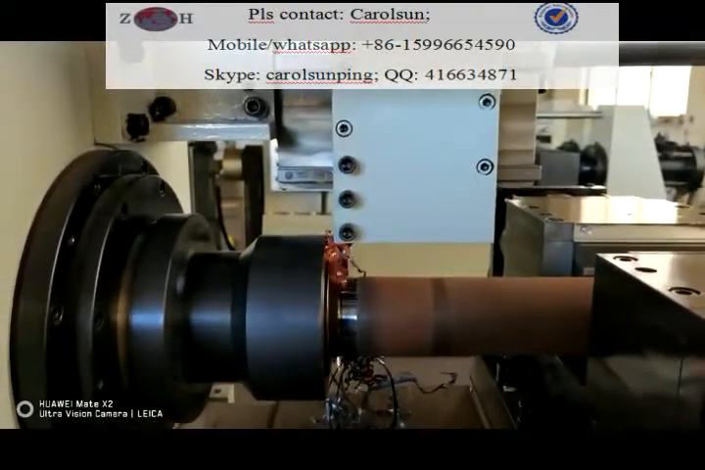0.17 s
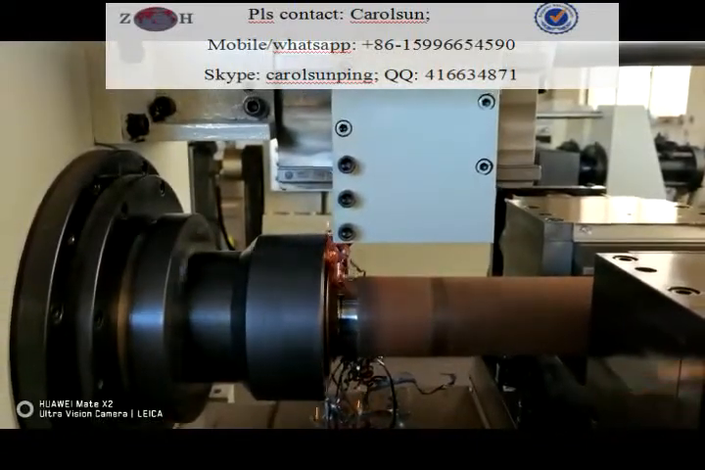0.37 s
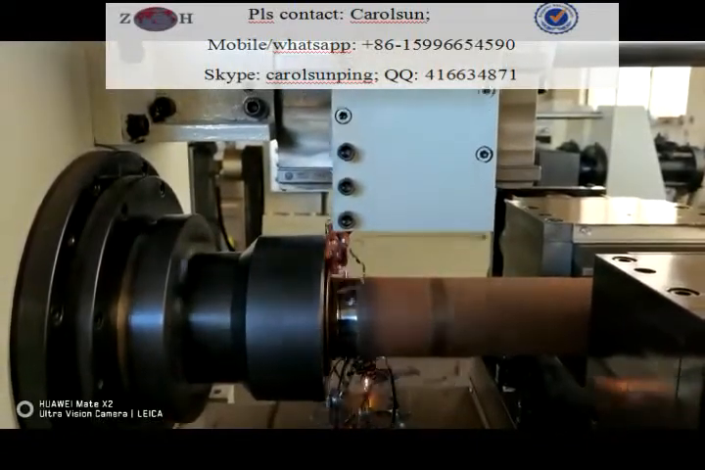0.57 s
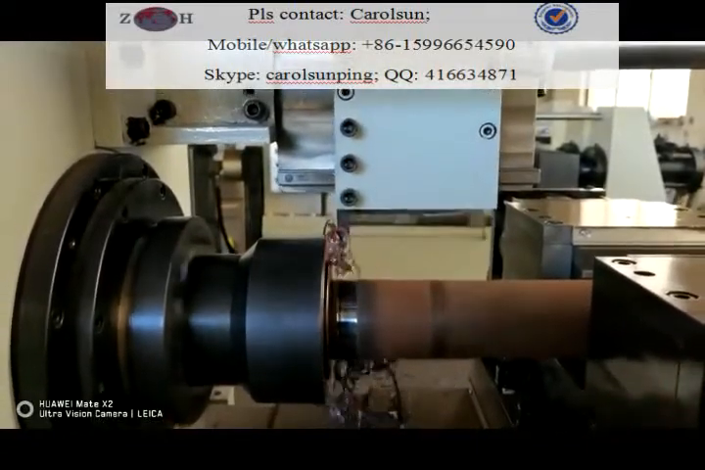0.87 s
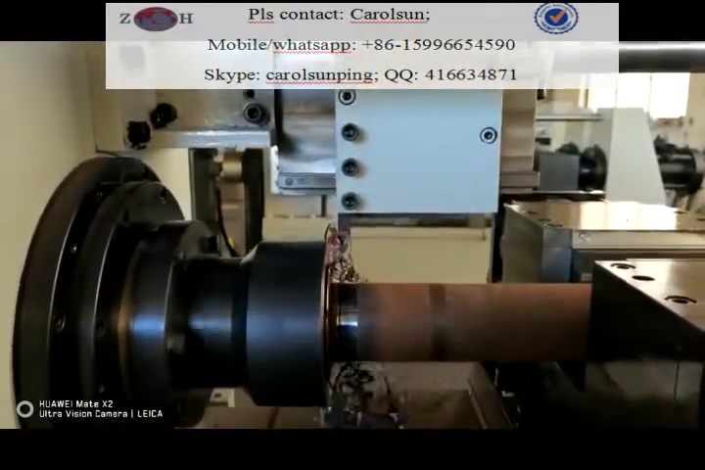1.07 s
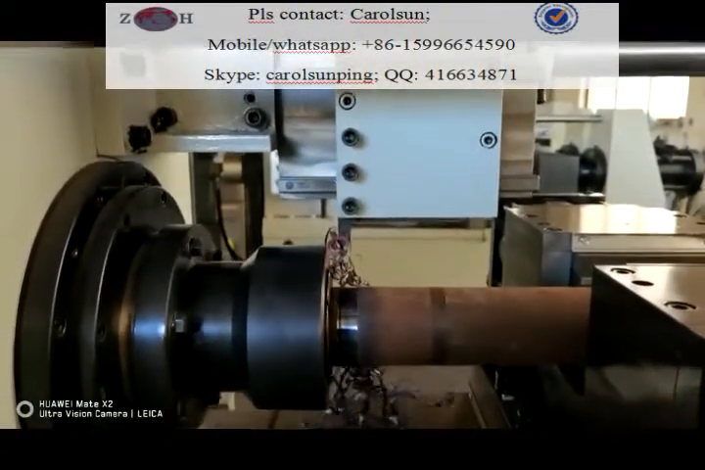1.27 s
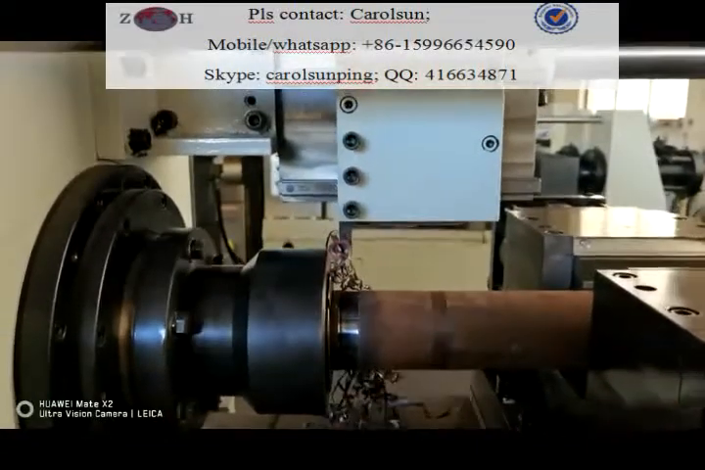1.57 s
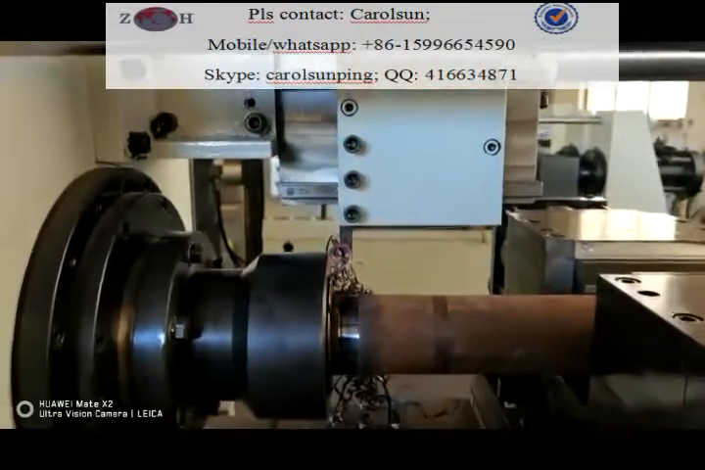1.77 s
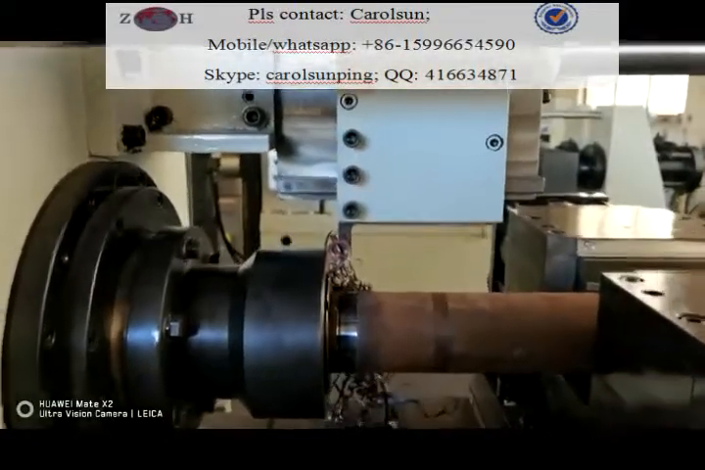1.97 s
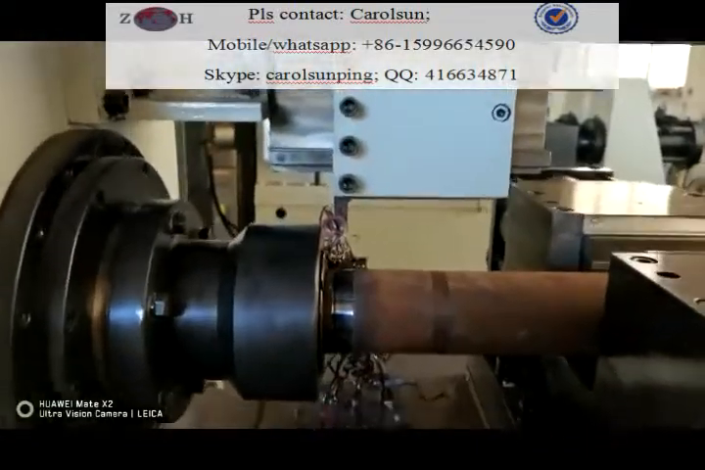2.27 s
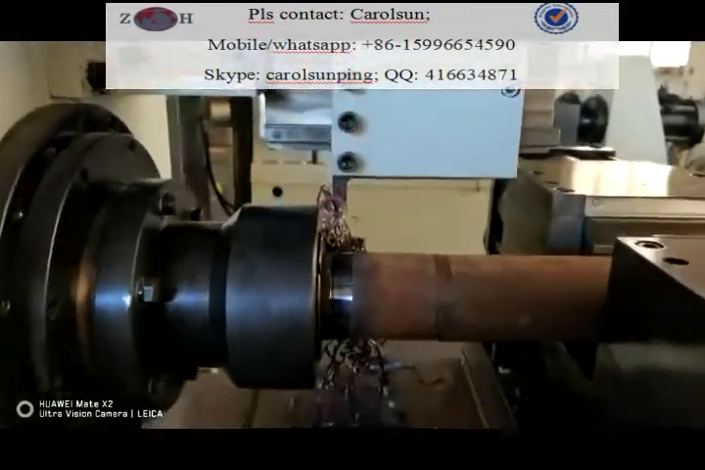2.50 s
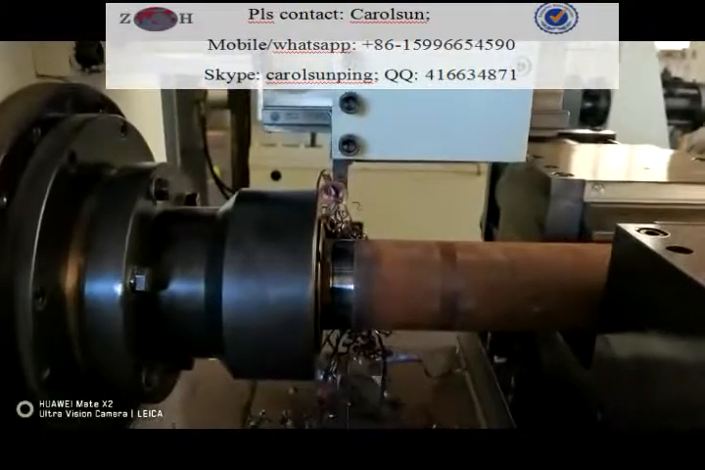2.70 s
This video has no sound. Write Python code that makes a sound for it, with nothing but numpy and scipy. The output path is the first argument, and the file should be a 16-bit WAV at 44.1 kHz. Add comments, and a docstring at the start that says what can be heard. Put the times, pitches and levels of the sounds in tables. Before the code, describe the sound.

Harsh squealing metal cutting on a lathe breaks off within a second, leaving machine hum and whine.

```python
"""In a workshop a lathe tool shaves the hot flash off a welded steel tube, heard from a hand-held phone.
The tearing chip drives the resonances of tool, tube and bed, and the tool squeals in short bursts.
The tool backs off, ringing on faintly, and the cut dies away, leaving the hydraulic pump's tones, a rumble
and a hiss; a dropped chip ticks once. Near the end the phone drifts sideways and the loudest pump tone
shifts between left and right."""
import sys
import numpy as np
from scipy import signal
from scipy.fft import rfft, irfft, next_fast_len
from scipy.io import wavfile
from scipy.ndimage import uniform_filter1d, map_coordinates

SR = 44100
rng = np.random.default_rng(int(sys.argv[2]) if len(sys.argv) > 2 else 0)


def materialize(psi):
    """Save the field psi as 16-bit PCM at rate SR to the path in sys.argv[1].

    A 1-D psi becomes a single channel; in a 2-D psi each row is a channel.
    """
    bounded = np.clip(np.atleast_2d(psi).T, -1, 1)
    quanta = np.round(bounded * 32767).astype(np.int16)
    wavfile.write(sys.argv[1], SR, quanta)


N = 125244
T = np.arange(N) / SR  # time of each sample [s]

# low throb of the machine frame: (time [s], level [dB])
THROB = [(0, -31), (.6, -33), (.75, -32.5), (1.0, -32), (1.15, -40.5), (1.7, -40), (1.9, -36), (2.1, -35.5),
         (2.25, -43), (2.84, -37.5)]
# resonances of tool and holder: (frequency [Hz], width [Hz], relative level [dB])
TOOL = [(1641, 125, -5.5), (1976, 145, -13), (2208, 100, -7), (2348, 58, -5.5), (2886, 250, -14),
        (3261, 100, -7.5), (3360, 22.7, 6.5), (3479, 89, 3), (3722, 220, 1.5), (4314, 150, -4),
        (4663, 160, -10), (4797, 156, -8), (5593, 136, -11.5)]
LOWER_MODES = 4  # the first rows of TOOL ring in the holder
TURN_S, RUNOUT_DB = 0.1495, 5.5  # one turn of the tube, and the swell as it runs out of true


def amp(db):
    """Decibels to a linear factor."""
    return 10 ** (np.asarray(db) / 20)


def unit(x):
    """x scaled to an rms of 1."""
    return x / np.sqrt(np.mean(x ** 2) + 1e-20)


def along(points, hz):
    """(Hz, value) points read on a log frequency axis."""
    f, v = np.transpose(points)
    return np.interp(np.log(hz + 1), np.log(f + 1), v)


def curves(rows):
    """One value per sample for each column after the time."""
    s, *columns = np.transpose(rows)
    return [np.interp(T, s, column) for column in columns]


def wobble(rate):
    """A smooth random curve with rate knots a second, 60 at most."""
    knots = rng.standard_normal(int(N * 60 / SR) + 4)
    return map_coordinates(knots, [np.arange(N) * min(rate, 60) / SR])


def filtered(x, response):
    """x times a complex response of frequency."""
    m = next_fast_len(N + SR // 4)
    return irfft(rfft(x, m) * response(np.fft.rfftfreq(m, 1 / SR)), m)[..., :N]


def resonance(f, hz, width):
    """One causal resonance, gain 1 at its top."""
    return 1j * f * width / (hz * hz - f * f + 1j * f * width)


def heard(pair, alike, lead):
    """Two unrelated signals mixed into left and right of the given likeness and phase lead."""
    def mid_and_side(hz):
        turn = np.arccos(np.clip(along(alike, hz), 0, 1)) / 2
        return np.array([np.cos(turn), np.sin(turn)])

    def left_leads(hz):
        return np.exp(.5j * np.outer([1, -1], along(lead, hz)))

    mid, side = filtered(pair, mid_and_side)
    return filtered(np.array([mid + side, mid - side]), left_leads)


def patchy(depth_db):
    """A pair of white noises with shared streaks of random gain, narrow in pitch and long in time."""
    z = signal.stft(rng.standard_normal((2, N)), nperseg=1024)[2]
    streaks = uniform_filter1d(rng.standard_normal(z.shape[1:]), size=3, axis=0)
    streaks = uniform_filter1d(streaks, size=7, axis=1)
    return signal.istft(z * amp(depth_db * unit(streaks)), nperseg=1024)[1][:, :N]


def rings(modes, drive, flutter_db, rate):
    """Fluttering noise under the drive excites each mode; a fourth value times its swell once a turn."""
    m = next_fast_len(N + SR // 4)
    f = np.fft.rfftfreq(m, 1 / SR)
    total = 0
    for hz, width, db, *peak_s in modes:
        gain_db = flutter_db * wobble(rate)
        for s in peak_s:
            gain_db = gain_db + RUNOUT_DB * np.cos(2 * np.pi * (T - s) / TURN_S)
        noise = rng.standard_normal((2, N)) * drive * amp(gain_db)
        total = total + amp(db) * resonance(f, hz, width) ** 2 * rfft(noise, m)
    return unit(irfft(total, m)[:, :N]) * np.sqrt(np.mean(drive ** 2))


def silenced(after_s):
    """A gain that falls 80 dB a second from the given time on."""
    return amp(-80 * np.clip(T - after_s, 0, None))


def hiss():
    """Patchy noise in two bands, each with its own level."""
    # hiss colour: (frequency [Hz], relative density [dB per Hz])
    hiss_colour = [(1050, -17), (1900, -20.5), (2400, -22.5), (3000, -21.5), (5600, -20), (8200, -31),
                   (12000, -36.5)]
    # (time [s], lower band level [dB], upper band level [dB])
    hiss_level = [(1.0, -48, -55.5), (2.1, -47, -54.5), (2.35, -46, -47.5), (2.84, -46.5, -48)]
    split_hz = 3980
    high = lambda hz: 1 / (1 + (split_hz / (hz + 1)) ** 6)
    colour = lambda hz: amp(along(hiss_colour, hz)) * (hz > 900)
    low_db, high_db = curves(hiss_level)
    lower = unit(filtered(patchy(depth_db=4.5), lambda hz: colour(hz) * (1 - high(hz))))
    upper = unit(filtered(patchy(depth_db=6.5), lambda hz: colour(hz) * high(hz)))
    return amp(low_db) * lower + amp(high_db) * upper


def rumble():
    """Patchy low noise that rises slowly, and noise ringing in the frame's resonances as a throb."""
    # rumble colour: (frequency [Hz], relative density [dB per Hz])
    rumble_colour = [(200, -14), (300, -7.5), (400, -20), (600, -11.5), (700, -22), (850, -10.5),
                     (1000, -20), (1100, -25)]
    # frame resonances: (frequency [Hz], width [Hz], relative level [dB])
    frame_modes = [(73.6, 7.8, -12), (117.4, 32, -4.5), (160, 26, -1), (196.7, 31, -13)]
    start_db, rise_db_per_s = -39.25, 0.5

    def colour(hz):
        return amp(along(rumble_colour, hz)) * (hz < rumble_colour[-1][0]) * (hz / (hz + 60)) ** 2

    noise = unit(filtered(patchy(depth_db=2.5), colour))
    throb = rings(frame_modes, amp(curves(THROB)[0]), flutter_db=0.5, rate=8.54)
    return noise * amp(start_db + rise_db_per_s * T) + throb


def drones():
    """Fuzzy tones of the idling machine: sines of scattering pitch and wavering level."""
    # (frequency [Hz], pitch scatter [Hz], level ahead of the stereo mix [dB],
    #  fade after the first second [dB per s])
    drone_tones = [(368, 5, -38.5, 9), (1954, 6, -58, -2), (2560, 50, -66, -5)]
    mono = 0
    for hz, scatter_hz, db, fade_db in drone_tones:
        level = amp(db - fade_db * np.clip(T - 1, 0, None) + 2.5 * wobble(12))
        phase = 2 * np.pi * np.cumsum(hz + scatter_hz * wobble(50)) / SR
        mono = mono + level * np.sin(phase)
    return np.array([[np.sqrt(2)], [0]]) * mono  # first of the pair only: alike on both sides


def tick():
    """A chip drops: a decaying noise burst through one broad resonance."""
    tick_s, level_db, decay_s = 1.072, -39, 0.0097  # level ahead of the resonance
    envelope = amp(level_db) * (T > tick_s) * np.exp(-np.abs(T - tick_s) / decay_s)
    return filtered(envelope * rng.standard_normal((2, N)), lambda f: resonance(f, 4600, 6800))


def shop():
    """The idling machine spread over the workshop, and the one tick."""
    # (frequency [Hz], likeness of left and right [0 to 1])
    shop_alike = [(40, .9), (90, .995), (200, .992), (700, .75), (1050, .25), (4000, .05)]
    # (frequency [Hz], phase by which left leads [rad])
    shop_lead = [(200, 0), (600, -.4), (870, -1.8), (1050, -.5)]
    return heard(rumble() + drones() + hiss(), shop_alike, shop_lead) + tick()


def pump():
    """The hydraulic pump: clean tones on multiples of the shaft speed."""
    # (time [s], shaft speed [Hz])
    shaft_speed = [(0, 49.72), (2.1, 49.73), (2.84, 49.58)]
    # (multiple of the shaft [1], level [dB rms], phase by which left leads [rad], waver [dB])
    pump_tones = [(4, -49, 0, 2), (6, -45, 0, 2), (12, -36, -.5, 1), (18, -48, -1.6, 2),
                  (19, -49, -1.6, 1.5)]
    # the loudest tone as the phone moves:
    # (time [s], left level [dB rms], right level [dB rms], phase by which left leads [rad])
    whine_levels = [(0, -33.5, -41, -1.5), (.9, -30, -37, -2.5), (1.3, -27, -36.5, -2),
                    (1.66, -29.5, -41.5, -1.5), (2.1, -27.5, -32.5, -2.5), (2.24, -25.5, -25, -1.5),
                    (2.4, -32.5, -27, -1.56), (2.65, -28, -24.5, -1.4), (2.84, -33, -25, -0.9)]
    whine_order = 17  # multiple of the shaft
    turn = 2 * np.pi * np.cumsum(curves(shaft_speed)[0]) / SR
    sides = np.array([[.5], [-.5]])
    out = 0
    for order, db, lead, waver_db in pump_tones:
        phase = order * turn + rng.uniform(0, 2 * np.pi) + sides * lead
        out = out + amp(db + waver_db * wobble(8.15)) * np.sin(phase)
    left_db, right_db, lead = curves(whine_levels)
    whine_level = amp(np.array([left_db, right_db]) + 1.5 * wobble(12))
    out = out + whine_level * np.sin(whine_order * turn + sides * lead)
    return np.sqrt(2) * out  # rms to peak


def feed_drive():
    """The feed drive whines as noise in narrow resonances until it stops."""
    # (frequency [Hz], level [dB rms])
    feed_tones = [(4000, -38), (8000, -50.5)]
    stop_s, ramp_s = 0.843, 0.028
    running = np.clip((stop_s - T) / ramp_s, 0, 1)
    return sum(amp(db) * rings([(hz, 16, 0)], running, flutter_db=3, rate=25) for hz, db in feed_tones)


def frame_tone():
    """The steady part of the frame's throb while cutting: one wavering sine."""
    level = amp(curves(THROB)[0] + 1.5 * wobble(8.7))
    return level * np.sin(2 * np.pi * 153 * T + 0.095 * wobble(5.0)) * silenced(0.83)


def squeals():
    """Squeals and the tool's last ringing: swelling rough tones, a scrape through the tool, a treble fizz."""
    # squeals, and in the faint rows near 3.3 kHz at 0.773 s and 0.901 s the tool ringing on:
    # (time [s], tone level [dB], pitch [Hz], length [s], fizz over the tone ahead of fizz_db [dB])
    tool_tones = [(0.011, -23.5, 4640, 0.04, 2.5), (0.035, -26, 3830, 0.013, 8),
                  (0.102, -24, 5030, 0.016, 10), (0.1334, -20.5, 4860, 0.017, 7),
                  (0.172, -15, 3640, 0.0091, -2.5), (0.198, -18, 4800, 0.017, 4),
                  (0.251, -20.5, 4820, 0.01, -19), (0.309, -22, 4840, 0.0085, 12),
                  (0.3508, -17, 5020, 0.019, 4), (0.4012, -19.5, 4920, 0.0073, -11),
                  (0.4574, -24, 5170, 0.015, -1), (0.495, -15, 4870, 0.0089, 0),
                  (0.542, -22.5, 4900, 0.0073, -10), (0.58, -20, 5160, 0.013, 7.5),
                  (0.609, -29.5, 4780, 0.018, 8), (0.647, -18, 4900, 0.013, 9.5),
                  (0.708, -27, 4880, 0.019, -15), (0.731, -22, 4960, 0.017, 10.5),
                  (0.773, -33, 3400, 0.025, 10), (0.827, -31.5, 5060, 0.0086, 3.5),
                  (0.901, -45.5, 3320, 0.056, 2)]
    fuzz_width_hz, roughness, scrape_db, fizz_db = 190, 0.69, 3, -22
    tone, scrape, fizz_level = np.zeros((2, N)), np.zeros(N), np.zeros(N)
    fuzz = unit(filtered(rng.standard_normal((2, N)), lambda f: 1 / (1 + (f / fuzz_width_hz) ** 2)))
    for s, db, hz, length, extra_db in tool_tones:
        from_peak = T - s - .004  # each tone peaks 4 ms after its time
        swell = amp(db) * np.exp(-(from_peak / (.5 * length)) ** 2)
        tone += swell * np.sin(2 * np.pi * hz * T) * ([[1], [0]] + roughness * fuzz)
        scrape += swell
        fizz_level += amp(db + extra_db) * np.exp(-(from_peak / length) ** 2)
    fizz = unit(filtered(patchy(depth_db=6), lambda f: resonance(f, 9000, 7000) ** 2))
    scraping = rings(TOOL[LOWER_MODES:], scrape, flutter_db=4.5, rate=44)
    return tone + amp(scrape_db) * scraping + amp(fizz_db) * fizz_level * fizz


def tearing():
    """The chip tears as broad noise; the band above about 2.5 kHz gets a random fluctuating gain."""
    # colour of the tear: (frequency [Hz], relative density [dB per Hz])
    tear_colour = [(40, -24), (150, -10.5), (640, -5), (1070, -6.5), (1105, -11), (1400, -16), (2300, -22),
                   (4850, -18.5), (6000, -21.5), (12000, -39.5)]
    noise = unit(filtered(patchy(depth_db=5.5), lambda hz: amp(along(tear_colour, hz))))
    bright = filtered(noise, lambda hz: 1 / (1 + (2500 / (hz + 1)) ** 4))
    return noise - bright + amp(5.2 * wobble(34.04) - 3.5) * bright


def bed():
    """Bed and tube shudder: noise rings their modes, each swelling once a turn."""
    # (frequency [Hz], width [Hz], relative level [dB], time of the first swell [s])
    bed_modes = [(411.7, 36, -1, 0.1), (439, 48, -2.5, 0.083), (602.1, 31, 4.5, 0.11), (640, 53, 2, 0.12),
                 (716.7, 28.6, 0, 0.021), (990, 49, -2, 0.13), (1031.7, 41, 1, 0.087)]
    # (time [s], level of the low shudder [dB])
    shudder_levels = [(0, -23.5), (.62, -24.5), (.72, -21.5), (.8, -28.5), (.87, -34.5), (1.2, -48.5)]
    [shudder_db] = curves(shudder_levels)
    drive = amp(shudder_db) * silenced(shudder_levels[-1][0])
    return rings(bed_modes, drive, flutter_db=2.5, rate=14)


def cut():
    """The force of the cut drives tearing noise and tool modes; all die away as the tool leaves."""
    # (time [s], force of the cut [dB], lower tool modes over the upper [dB])
    cut_force = [(0, -23, -1), (.2, -23, 0.5), (.33, -22.5, 6), (.52, -24.5, 6), (.62, -23.5, -0.5),
                 (.74, -23.5, 0.5), (.79, -27.5, -8), (.83, -39.5, -5), (1.0, -50.5, -1), (1.1, -48, -2)]
    # (frequency [Hz], likeness of left and right [0 to 1])
    cut_alike = [(200, .992), (450, .9), (900, .65), (2000, .72), (4800, .6), (8000, .4)]
    # (frequency [Hz], phase by which left leads [rad])
    cut_lead = [(200, 0), (430, -.9), (640, -1.2), (850, -2.2), (1030, -.9), (1700, .45), (3000, 0),
                (3360, -2.4), (4100, -3.4), (4800, -6.2), (6600, -9.8), (11400, -31)]
    tear_db, tool_db, holder_db = 0.5, -0.5, -9
    force_db, lower_db = curves(cut_force)
    force = amp(force_db) * silenced(cut_force[-1][0])
    tool = amp(tool_db) * rings(TOOL[LOWER_MODES:], force, flutter_db=4.5, rate=40)
    holder = rings(TOOL[:LOWER_MODES], force * amp(lower_db), flutter_db=5.0, rate=22.8)
    tear = force * amp(tear_db) * tearing()
    pair = tool + amp(holder_db) * holder + bed() + tear + squeals()
    return heard(pair, cut_alike, cut_lead) + feed_drive() + frame_tone()


def scene():
    """The cut over the pump and the idling machine."""
    return shop() + pump() + cut()


def record(dry):
    """The phone's microphone path cuts off steeply above its band limit."""
    top_hz = 12080
    return filtered(dry, lambda hz: 1 / (1 + (hz / top_hz) ** 240))


dry = scene()
out = record(dry)
materialize(out)
```